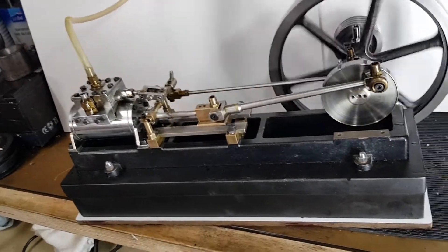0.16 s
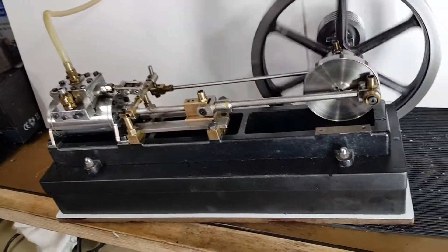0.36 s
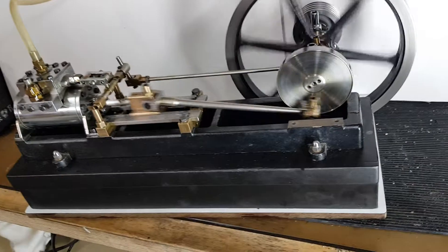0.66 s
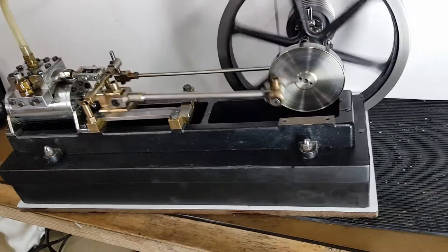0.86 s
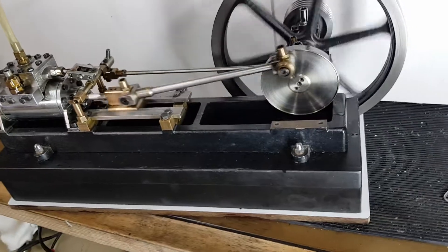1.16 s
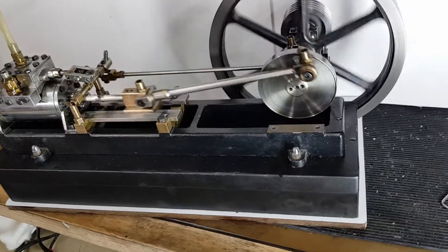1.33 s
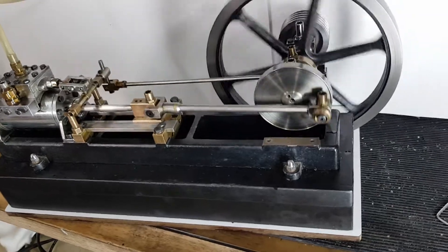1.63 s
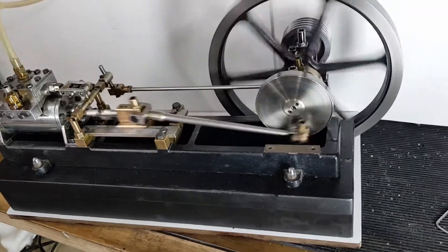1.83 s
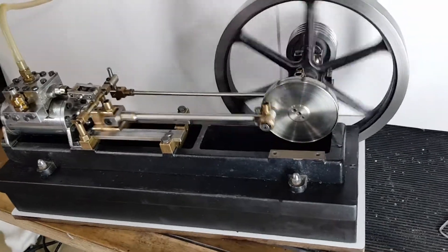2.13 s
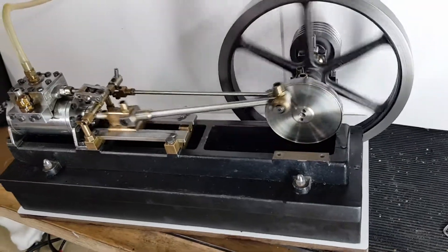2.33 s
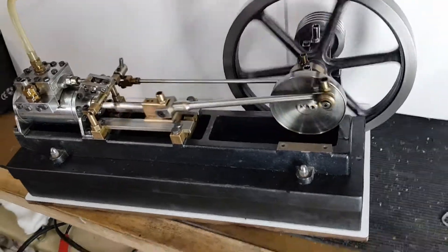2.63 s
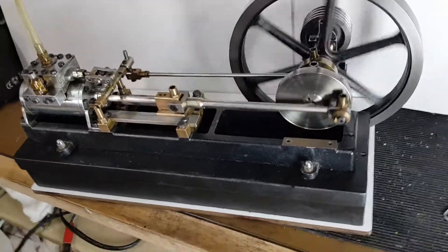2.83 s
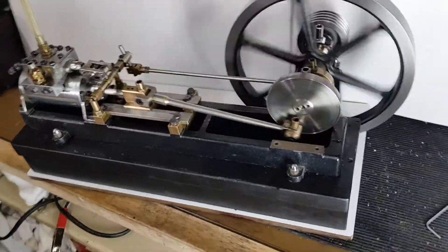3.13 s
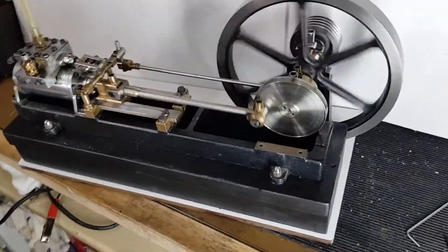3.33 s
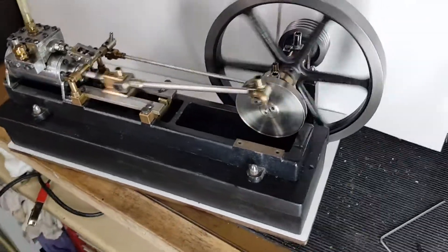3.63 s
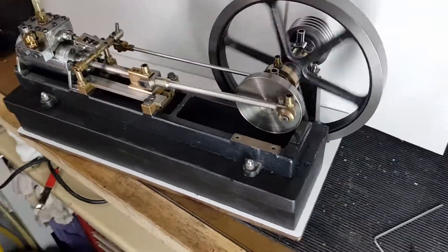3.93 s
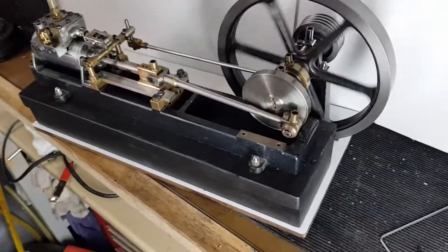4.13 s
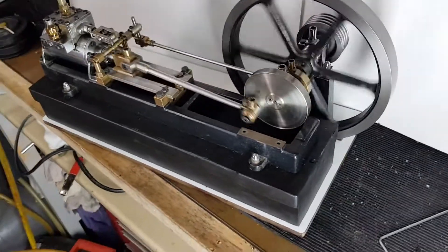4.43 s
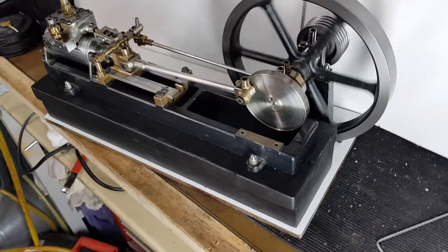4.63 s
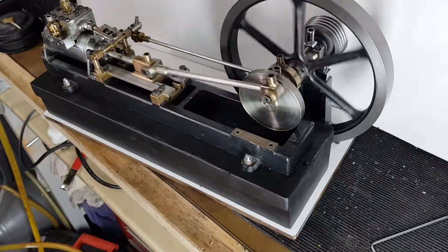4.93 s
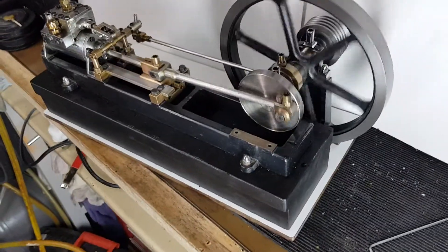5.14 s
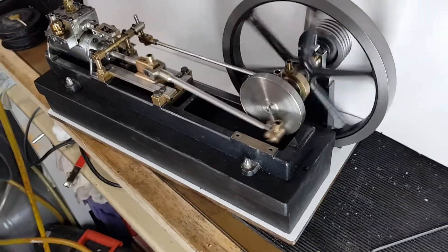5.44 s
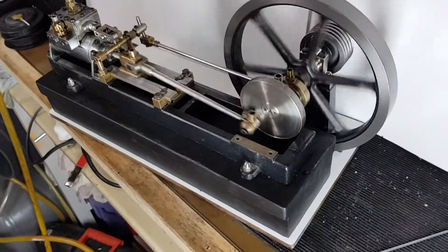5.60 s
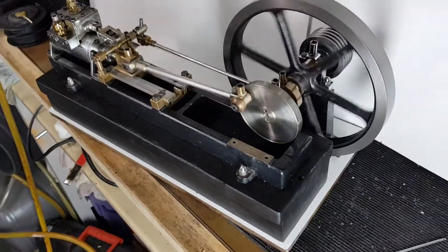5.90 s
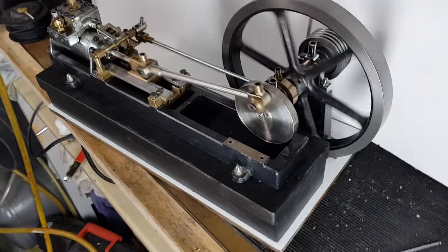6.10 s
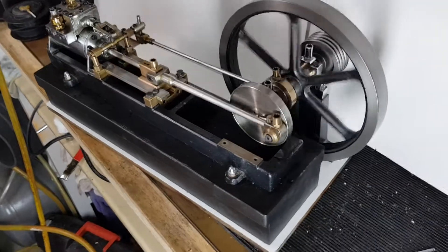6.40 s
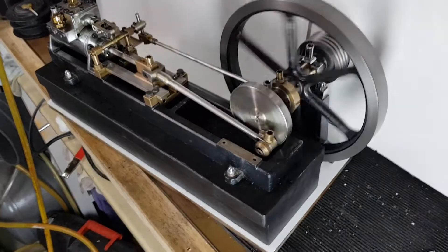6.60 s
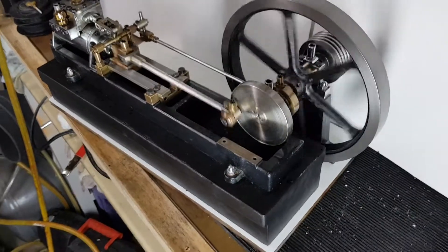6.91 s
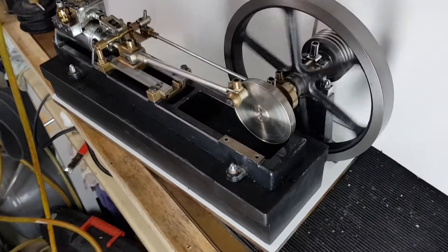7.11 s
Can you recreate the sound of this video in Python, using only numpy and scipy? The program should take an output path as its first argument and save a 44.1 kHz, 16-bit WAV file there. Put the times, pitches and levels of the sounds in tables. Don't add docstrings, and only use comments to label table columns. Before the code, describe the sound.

Close handheld stereo pickup of a miniature air-driven engine indoors. High, thin hiss dominates, dipping around two seconds and growing stronger as the phone comes nearer. Slow, regular little knocks ring briefly in the metal bed, with valve chirps and breathy exhaust sighs around them. Narrow whistles come and go over a faint rumble and distant motor hum. Loud bumps, rubs and case creaks hit the right channel early and late, briefly ducking the rest.

```python
import sys
import numpy as np
from scipy import signal
from scipy.fft import rfft, irfft
from scipy.io import wavfile
from scipy.ndimage import uniform_filter1d, map_coordinates

SR = 44100
rng = np.random.default_rng(int(sys.argv[2]) if len(sys.argv) > 2 else 0)


def elevation(decibels):
    levels = np.asarray(decibels, float)
    return 10 ** (levels / 20)


def master(y):
    cut = np.clip(np.atleast_2d(y).T, -1, 1)
    pcm = np.round(cut * 32767)
    wavfile.write(sys.argv[1], SR, pcm.astype(np.int16))


N = 320166

# frequency in Hz, level in dB per Hz.
LEAK_LOW_LEFT = [(2500, -33), (3900, -23.5), (4150, -13.5), (5200, -7), (5900, 1), (6300, -2), (7000, -5.5),
                 (8000, -14), (9500, -20)]
LEAK_LOW_RIGHT = [(2500, -31.5), (3900, -23.5), (4200, -11.5), (5300, -3.5), (6000, -0.5), (6600, -2),
                  (7300, 1), (8200, -10.5), (9500, -21.5)]
LEAK_HIGH_LEFT = [(8000, -17.5), (9500, -11.5), (10500, -6), (11300, -1.5), (12200, 2.5), (12800, -3),
                  (13300, -10), (15800, -28)]
LEAK_HIGH_RIGHT = [(8000, -10), (9500, -9), (10500, -4), (11500, -2), (12200, 2.5), (13000, -1.5),
                   (13700, -5.5), (15800, -16)]
LEAK_TOP_LEFT = [(12500, -16.5), (13300, -1), (13800, 1), (14300, -4.5), (15000, -2), (15800, -3.5)]
LEAK_TOP_RIGHT = [(12500, -18), (13600, -7), (14300, -4), (15000, -2), (15400, -1), (15800, -6)]
# time in seconds, left level in dB, right level in dB, both against the upper band.
GLINT = [(0, -12, -8), (.6, -5, -4), (1.0, -3, 3), (2.2, -14, -12), (2.9, -12, -2), (3.2, -10, 2.5),
         (3.8, -5, 0), (4.3, -12, -13), (4.9, -10, -1), (5.3, -4, -4), (5.7, -8, 0), (6.1, -13.5, -3.5),
         (6.5, -6.5, -9), (7.26, -6.5, -9)]
# time in seconds, leak level by nearness in dB,
# facing (left over right) in dB, aim at the jet in dB.
PHONE = [(0, -48.5, 6.5, -1), (.45, -47.5, 6.5, -2.5), (.72, -46.5, 1, -0.5), (1.05, -51.5, 4.5, -2),
         (1.65, -54.5, 7.5, 1.5), (2.25, -55, 7.5, 2.5), (2.6, -55.5, 8, -2), (2.95, -52.5, 4, 0.5),
         (3.15, -48.5, 1, 0), (3.5, -46.5, 0, 0.5), (4.05, -45.5, 1.5, 0.5), (4.65, -45.5, -0.5, 3.5),
         (5.35, -46.5, 1, -1), (5.75, -44, 1, 3.5), (6.0, -48, 7, 4.5), (6.4, -47, -1.5, 0.5),
         (7.0, -50.5, -1.5, 4.5), (7.26, -53.5, 2, 2)]
SURGE_DB = [6.9, 5.1, 3.3, 6.1, 6.6, 3.6, 6, 5.3, 3.7, 3.1, 7.2, 3, 9.9]
# start in seconds, end in seconds, pitch in Hz, level over the low jet in dB.
WHISTLES = [
    (0, .7, 5970, -10.5),
    (3.05, 3.3, 6100, -22),
    (3.673, 4.5, 5980, -7.5),
    (3.68, 4.2, 5840, -21),
    (4.3, 5.74, 5670, -16.5),
    (4.7, 5.74, 5845, -12.5),
    (4.8, 5.6, 6050, -19),
    (5.846, 6.406, 5850, -19),
    (5.85, 6.396, 6090, -17),
]
# time in seconds, peak in dB, brightness in dB, left over right in dB.
KNOCKS = [(0.487, -40, -23.5, 0), (1.043, -40.5, -11.5, 1), (1.708, -52, -21, -6),
          (2.262, -42.5, -16.5, -3), (2.942, -44.5, -2.5, -4), (3.494, -36, -7.5, -0.5),
          (4.136, -38.5, -21.5, -3), (4.679, -37, -5.5, 1.5), (5.342, -44, -19.5, 0), (5.904, -39, -8, -2),
          (6.559, -43.5, -19.5, 0), (7.086, -43, -7.5, 1.5)]
# pitch in Hz, level in dB, time to fade by 60 dB in seconds.
BED = [(158, 0.5, 0.086), (224, -11.5, 0.038), (324.6, -1.5, 0.089), (426, -3, 0.011), (500, 2.5, 0.089),
       (610, -6, 0.048), (679, -10, 0.089), (900, -22, 0.038), (1050, -11, 0.091), (1350, 0, 0.018),
       (1616, -8, 0.042), (1770, -12, 0.012), (2500, -17, 0.005), (3500, -6, 0.003)]
# time in seconds, left level in dB, right level in dB, seat tap in dB.
CHIRPS = [(0.4204, -40, -45, -73), (0.9971, -50, -52, -80), (1.643, -53, -50, -78), (2.218, -59, -55, -78),
          (2.8788, -48, -51, -80), (3.454, -50, -41.5, -79), (4.0739, -43, -41.5, -77),
          (4.6347, -41.5, -49, -76), (5.274, -38.5, -42, -73.5), (6.4944, -42.5, -44.5, -77),
          (7.0503, -51.5, -56, -86)]
# start in seconds, length in seconds, pitch in Hz,
# level in dB, broad air in dB against the note.
SIGHS = [(0.61, 0.13, 1350, -84, -12), (1.128, 0.13, 1235, -72, -19), (1.76, 0.3, 1350, -77.5, 9),
         (3.056, 0.14, 1318, -69.5, -3), (3.528, 0.23, 1296, -67, -8), (4.201, 0.17, 1355, -62.5, -7),
         (4.725, 0.22, 1300, -63.5, -6), (5.4, 0.22, 1350, -67, 5), (5.954, 0.22, 1300, -65, -12),
         (6.648, 0.14, 1350, -67.5, -5), (7.111, 0.15, 1246, -66.5, -7)]
# start in seconds, length in seconds, level in dB.
PUFF = (2.928, .1, -47)
# time in seconds, level in dB.
GRIP = [(0, -42.5), (.44, -43), (.66, -35.5), (.76, -38.5), (.88, -56.5), (1.25, -46.5), (1.76, -51),
        (2.2, -43), (2.86, -43.5), (3.5, -60), (4.6, -50), (5.3, -66), (5.6, -53), (5.72, -34.5),
        (5.85, -34), (6.03, -40.5), (6.17, -33), (6.35, -62)]
# time in seconds, pressure step in dB, direction,
# rise in milliseconds, wind-up as a share of the step.
BUMPS = [(.6754, -13.5, 1, 2.0, 0), (.6843, -21, 1, 0.8, 0.9), (.6868, -15, -1, 3, 0.057),
         (.6898, -12.5, 1, 0.57, 1), (.6923, 5, 1, 1.06, 0.22), (.7101, -3.5, 1, 0.69, 0.34),
         (.7119, -12.5, -1, 0.79, 0), (5.7715, -6, -1, 0.4, 0.42), (5.7731, -11, 1, 1.5, 0),
         (5.7847, -19, 1, 0.59, 0.84), (5.791, -10, 1, 1.3, 0), (5.795, -13.5, -1, 0.9, 0.1),
         (5.799, -15, 1, 0.6, 0), (5.8044, -6.5, 1, 4.7, 0), (5.8158, -14, 1, 0.99, 1),
         (6.1766, 5, 1, 2.14, 0.35)]
# time in seconds, pressure step in dB, rise in milliseconds.
SHIFTS = [(0.238, -27.5, 3.2), (0.3329, -29.5, 1.4), (0.7928, -37, 0.56), (1.108, -36.5, 0.74),
          (1.1837, -34.5, 2.3), (1.2928, -26.5, 1.83), (1.347, -32.5, 1.6), (1.4473, -26.5, 1.47),
          (1.4992, -26, 1.12), (1.6558, -28, 1.1), (1.987, -32, 0.98), (2.0568, -33.5, 0.9),
          (2.1294, -31.5, 0.53), (2.2617, -27.5, 0.65), (2.42, -32, 3), (2.5326, -34, 0.5),
          (2.62, -38, 1.7), (2.824, -26.5, 4.9), (3.0274, -34, 1), (3.0372, -25, 4.8), (3.185, -38.5, 1.4),
          (3.649, -41, 0.59), (3.6951, -34.5, 0.88), (4.462, -33.5, 1.3), (4.528, -29.5, 1.15),
          (5.533, -41.5, 1.1), (5.972, -27, 2.1), (6.05, -19, 4.5), (6.078, -20, 4.9), (6.242, -24, 0.72),
          (6.3636, -29.5, 0.32)]
# time in seconds, length in milliseconds, step in dB,
# loss per swing in dB, gap in milliseconds.
JUDDERS = [
    (5.664, 4, -18, 1.5, 2.35),
    (5.6698, 6.5, -21, 1, 1.66),
    (5.7119, 14, -16, 0.6, 2.08),
    (6.1822, 8, -10, .3, 2.69),
]
# start in seconds, length in seconds, level in dB, treble cut in Hz.
RUBS = [(0.631, 0.047, -43.5, 2490), (0.648, 0.009, -39, 3000), (0.667, 0.009, -37, 1500),
        (0.681, 0.01, -29, 1000), (0.705, 0.023, -39.5, 900), (2.108, 0.038, -56, 900),
        (2.225, 0.044, -44, 1150), (2.359, 0.048, -59, 1200), (2.506, 0.051, -52.5, 1200),
        (2.658, 0.066, -57.5, 1000), (2.879, 0.057, -60, 1000), (4.102, 0.031, -43.5, 3500),
        (4.52, 0.053, -67, 500), (5.655, 0.028, -43.5, 600), (5.702, 0.051, -35, 800),
        (5.746, 0.027, -28.5, 1800), (5.766, .032, -23.5, 900), (5.797, 0.022, -25.5, 1030),
        (6.068, 0.035, -54.5, 900), (6.162, 0.037, -33, 700), (6.175, 0.013, -24.5, 1500),
        (6.185, 0.013, -39.5, 1800), (6.23, 0.014, -44, 900)]
# time in seconds, level in dB, pitch in Hz.
TICKS = [(0.628, -28, 2500), (0.6306, -14, 3340), (0.636, -25, 3000), (.641, -32, 2500), (0.647, -19, 3600),
         (.650, -25, 3600), (0.654, -29, 2400), (.6755, -25.5, 1600), (.684, -18, 1300),
         (0.6882, -26, 1500), (0.692, -19.5, 2500), (0.7102, -28, 1790), (5.675, -31.5, 2500),
         (5.716, -35, 1800), (5.726, -30, 1400), (5.752, -30, 1400), (5.758, -27, 1400), (5.764, -30, 1500),
         (5.8, -19, 1700), (5.808, -27, 1900), (5.8162, -18.5, 1690), (6.168, -31.5, 1700),
         (6.1772, -15.5, 1800), (6.184, -18, 1700), (6.3623, -40.5, 3000)]
# time in seconds, drop in dB.
DUCKS = [
    (.69, 4.5),
    (5.775, 4.5),
    (6.18, 7.5),
]
# frequency in Hz, level in dB per Hz.
SLIDE = [(300, 2), (600, -5), (900, -3), (1300, -3), (1900, -1), (2600, 1), (3400, 5.5), (3800, 6),
         (4300, 8), (6000, -5.5)]
SLIDE_STROKE_DB = [-0.5, -1.5, -4.5, 3, 0, -2, 1, 1, -1.5, 3, 6, 0, -1]
# frequency in Hz, level in dB per Hz.
RUMBLE = [(25, -25), (45, -2.5), (62, 6.5), (90, -17), (140, -18.5), (300, -19), (550, -34.5), (900, -47.5)]
# time in seconds, level in dB.
STEPS = [(0, -4), (.15, 2), (.35, 1.5), (1.2, -1.5), (3.2, 1), (3.35, -3), (3.55, 0), (3.9, 4), (4.3, -0.5),
         (4.65, 5.5), (5, -7), (5.35, 0.5), (5.65, -6.5), (6, -1), (7.26, -1)]
# start in seconds, end in seconds, level in dB.
DRONE = [
    (0.122, 1.6, -63.5),
    (3.116, 3.703, -65.5),
    (3.695, 4.517, -61.5),
    (4.483, 6.1, -64.5),
    (6.396, 7.305, -73.5),
]
# start in seconds, end in seconds, pitch in Hz, level in dB.
DRAUGHT = (0, 0.9, 2103, -77.5)


def unit(x):
    return x / np.sqrt(np.mean(x ** 2, axis=-1, keepdims=True) + 1e-20)


def track(rows):
    s, *columns = np.transpose(rows)
    return [np.interp(np.arange(N) / SR, s, column) for column in columns]


def band(x, low_hz, high_hz, order):
    return signal.sosfilt(signal.butter(order, [low_hz, high_hz], "band", fs=SR, output="sos"), x)


def colour(x, points):
    hz, level_db = np.transpose(points)
    bins = np.maximum(np.arange(N // 2 + 1) * SR / N, 1)
    gain_db = np.interp(np.log(bins), np.log(hz), level_db, left=-70, right=-70)
    return unit(irfft(rfft(x) * elevation(gain_db), N))


def drift(rate):
    r = np.exp(-80 * np.pi * rate / SR)
    chance = rng.standard_normal(N // 40 + 4002)
    slow = signal.lfilter([1], [1, -2 * r, r * r], chance)[4000:]
    return np.interp(np.arange(N) / 40, np.arange(len(slow)), unit(slow - slow.mean()))


def ring(x, hz, t60):
    r, w = elevation(-60 / (t60 * SR)), 2 * np.pi * hz / SR
    return signal.lfilter([0, np.sin(w)], [1, -2 * r * np.cos(w), r * r], x + 1e-18)


def add(out, x, s, pan_db=0):
    i = round(s * SR)
    sides = elevation(np.array([[.5], [-.5]]) * pan_db)
    out[:, i:i + x.shape[-1]] += x[..., :N - i] * sides


def swell(length, rise):
    place = np.linspace(0, 1, max(round(length * SR), 8))
    height = np.interp(place, [0, np.clip(rise, .02, .9), 1], [0, 1, 0])
    return np.sin(np.pi / 2 * height) ** 2


def reflections(x, depth, span_hz, span_s):
    hz, s, frames = signal.stft(x, SR, nperseg=2048)
    grid = np.meshgrid(hz / span_hz, s / span_s, indexing="ij")
    knots = rng.standard_normal((2, 400, 60))
    real, imag = [map_coordinates(k, grid, order=1, mode="mirror") for k in knots]
    return signal.istft(frames * (1 + depth * (real + 1j * imag)), SR, nperseg=2048)[1][:N]


def strokes():
    stroke_s, valve_lead_s = 0.66, 0.025
    ends = np.array(KNOCKS)[:, 0] - valve_lead_s
    ends = np.r_[ends[0] - stroke_s, ends, ends[-1] + stroke_s]
    return np.interp(np.arange(N) / SR, ends, np.arange(len(ends)))


def surge():
    turn = strokes()
    return np.array(SURGE_DB)[turn.astype(int)] * np.sin(np.pi * turn) ** 2


def jet_levels():
    near_db, facing_db, aim_db = track(PHONE)
    surge_db = surge()
    low_db = near_db + 0.33 * surge_db
    high_db = near_db - 1.5 - 2.0 + aim_db + surge_db
    lean_db = 0.97 * facing_db - 2.5
    low = elevation(low_db + facing_db / 2), elevation(low_db - facing_db / 2)
    high = elevation(high_db + lean_db / 2), elevation(high_db - lean_db / 2)
    return low, high


def leak():
    jet = rng.standard_normal(N) * elevation(0.82 * drift(40))
    low, high = jet_levels()
    glint = [elevation(db) for db in track(GLINT)]
    lead_ms = (.2, 0.0087)
    colours = ((LEAK_LOW_LEFT, LEAK_HIGH_LEFT, LEAK_TOP_LEFT), (LEAK_LOW_RIGHT, LEAK_HIGH_RIGHT, LEAK_TOP_RIGHT))
    out = []
    for side, (lower, upper, top) in enumerate(colours):
        early = np.roll(jet, -round(lead_ms[side] * SR / 1000))
        heard = unit(reflections(early, depth=2.17, span_hz=59.9, span_s=.45))
        heard = heard + 0.41 * rng.standard_normal(N)
        low_part = low[side] * elevation(0.25 * drift(17)) * colour(heard, lower)
        high_part = colour(heard, upper) + glint[side] * colour(heard, top)
        out.append(low_part + high[side] * elevation(0.5 * drift(8.5)) * high_part)
    shade = np.clip(1.9 - 2.03 * low[1] / low[0], 0, .985)
    notch = signal.butter(3, [6800, 9000], "band", fs=SR, output="sos")
    out[1] = out[1] - shade * signal.sosfiltfilt(notch, out[1])
    return np.array(out)


def whistle():
    t60_s, fade_s = 0.028, 0.044
    low, _ = jet_levels()
    t, noise, tone = np.arange(N) / SR, rng.standard_normal(N), np.zeros(N)
    for start, end, hz, db in WHISTLES:
        a, b = max(round((start - .1) * SR), 0), round((end + .1) * SR)
        inside = np.minimum(t[a:b] - start, end - t[a:b])
        heard = np.clip(inside / fade_s + .5, 0, 1)
        tone[a:b] += elevation(db) * heard * unit(ring(ring(noise[a:b], hz, t60_s), hz, t60_s))
    return elevation(1.16 * drift(6.6)) * np.array([low[0] * np.roll(tone, -8), low[1] * tone])


def knock(bright_db):
    chance = rng.standard_normal((2, round(.18 * SR)))
    buzz = band(chance[:, ::-1], 250, 1800, 1)
    bounces = (chance[0] + 0.46 * chance) ** 3
    sharp = np.clip(1.43 + bright_db / 22, .15, 1)
    body = 0
    for hz, db, t60 in BED:
        blow = np.zeros(bounces.shape)
        rattle = swell(0.007 + 4.5 / hz, 0.074)
        late = round((0.0036 + sharp * 3.73 / hz) * SR)
        hit = slice(late, late + len(rattle))
        blow[:, hit] = rattle * bounces[:, hit]
        uneven_db = rng.normal(0, 1.8, (2, 1))
        treble_db = np.clip(np.log2(hz / 550), 0, 1) * (bright_db + 8.5)
        rung = ring(blow, hz, t60)
        body = body + elevation(db + treble_db + uneven_db) * rung / np.abs(rung).max(axis=1, keepdims=True)
    t = np.arange(buzz.shape[1]) / SR
    buzz_shape = elevation(-21.5 - 190 * t) * np.clip(t / .012, 0, 1) ** 2
    return body / np.abs(body).max() + buzz_shape * unit(buzz)


def chirp(out, s, left_db, right_db, tap_db):
    shape = swell(0.032, 0.095)
    edge = rng.standard_normal(len(shape)) * shape
    pitches = np.array([4170, 4300]) * (1 + .015 * rng.standard_normal(2))
    tones = unit(np.array([ring(ring(edge, hz, 0.0084), 1.014 * hz, 0.008) for hz in pitches]))
    add(out, elevation(np.array([[left_db], [right_db]]) - 8.0) * tones, s - .004)
    add(out, elevation(tap_db) * unit(ring(ring(edge, 910, 0.016), 920, 0.016)), s - .006, 3.0)


def sigh(length, hz, airy_db):
    shape = swell(length + .08, 0.18) ** 0.52
    chance = rng.standard_normal((6, len(shape)))
    throb = elevation(1.1 * unit(uniform_filter1d(chance[0], size=900)))
    wobble = np.cumsum(uniform_filter1d(chance[1], size=600)) * .12
    sag = hz * (1 + 0.045 * np.sin(np.linspace(0.3, np.pi, len(shape))) - .028)
    note = np.sin(2 * np.pi * np.cumsum(sag) / SR + wobble)
    breathy = unit(ring(ring(chance[2:4], hz, .04), 1.01 * hz, 0.038))
    air = unit(ring(chance[4:], 1.1 * hz, 0.016) + 0.71 * ring(chance[4:], 1.9 * hz, 0.011))
    air = air * elevation(airy_db + np.array([[-3.0], [3.0]]))
    return shape * (throb * (1.13 * note + 0.65 * breathy) + air)


def puff(length):
    chance = rng.standard_normal(round(length * SR))
    shape = swell(length, 0.12) ** 0.87 * elevation(3.1 * unit(uniform_filter1d(chance, size=120)))
    return shape * unit(band(rng.standard_normal((2, len(shape))), 1250, 3400, 2))


def engine():
    out = np.zeros((2, N))
    for s, peak_db, bright_db, pan_db in KNOCKS:
        add(out, elevation(peak_db + 3.0) * knock(bright_db), s - .0115, pan_db)
    for s, left_db, right_db, tap_db in CHIRPS:
        chirp(out, s, left_db, right_db, tap_db)
    for s, length, hz, level_db, airy_db in SIGHS:
        add(out, elevation(level_db - 4.5) * sigh(length, hz, airy_db), s - .02)
    s, length, level_db = PUFF
    add(out, elevation(level_db) * puff(length), s)
    return out


def slips():
    judders = []
    for s, length, db, loss_db, gap in JUDDERS:
        for k in range(int(np.ceil(length / gap))):
            direction = -(-1) ** k
            judders.append((s + k * gap / 1000, db - loss_db * k, direction, 1, 0.14))
    shifts = [(s, db, 1, rise, 0.4) for s, db, rise in SHIFTS]
    return BUMPS + judders + shifts


def slip_flow():
    flow = np.zeros(N)
    for s, step_db, direction, rise_ms, windup in slips():
        step, before = swell(1.77 * rise_ms / 1000, 0.35), swell(1.7 * rise_ms / 1000, 0.9)
        size, i = np.sign(direction) * elevation(step_db), round(s * SR)
        flow[i:][:len(step)] += size * step / step.sum()
        flow[i - len(before):i] -= size * windup * before / before.sum()
    return flow


def rubs():
    out = np.zeros(N)
    for s, length, level_db, dull_hz in RUBS:
        shape = swell(1.4 * length, .42) ** .9
        grains = rng.standard_normal(len(shape)) * elevation(5.7 * rng.standard_normal(len(shape)))
        grains = signal.sosfilt(signal.butter(1, min(dull_hz, 9000), fs=SR, output="sos"), grains)
        grains = band(grains, 260, 5500, 2)
        grains = unit(grains) + 0.22 * unit(ring(grains, 1960, 0.0014))
        out[round(s * SR):][:len(shape)] += elevation(level_db) * shape * unit(grains)
    return out


def creaks():
    out = np.zeros(N)
    click = np.r_[1., np.zeros(600)]
    for s, db, hz in TICKS:
        i = round(s * SR)
        crack = ring(click, hz, 6.4 / hz)
        crack = crack + 0.45 * ring(click, 1.4 * hz, 0.0017) + 0.24 * ring(click, 0.75 * hz, 0.0044)
        out[i:i + len(click)] += elevation(db) * crack
    return band(out, 700, 7000, 2)


def port(x):
    for hz, q in ((60.6, 1.35), (40, .7)):
        w = 2 * np.pi * hz / SR
        a = np.sin(w) / (2 * q)
        x = signal.lfilter(np.array([1, -2, 1]) * (1 + np.cos(w)) / 2, [1 + a, -2 * np.cos(w), 1 - a], x)
    return x


def creep():
    sizes = elevation(2.1 * np.minimum(rng.exponential(1, N), 3))
    nudges = rng.standard_normal(N) * (rng.random(N) < 250 / SR) * sizes
    nudges = signal.sosfilt(signal.butter(2, 170, fs=SR, output="sos"), nudges)
    return unit(port(signal.lfilter([1], [1, -.999], nudges)))


def fingers():
    pressure = signal.lfilter([1], [1, -.9995], slip_flow()) + rubs() + creaks()
    held = elevation(-4.5) * elevation(track(GRIP)[0]) * creep()
    return (port(pressure) + held) * elevation(np.array([[-66], [0]]))


def rustle():
    skin = band(rng.standard_normal(N), 500, 3000, 1)
    return elevation(-28 + 2.1 * drift(15)) * elevation(track(GRIP)[0]) * unit(skin) * np.array([[0], [1]])


def nearness():
    near_db = track(PHONE)[0]
    return near_db - near_db.mean()


def sliding():
    turn = strokes()
    swing_db = 2 * np.cos(2 * np.pi * (turn - 0.18))
    swing_db = swing_db + np.interp(turn, np.arange(len(SLIDE_STROKE_DB)) + .5, SLIDE_STROKE_DB)
    level = elevation(-66.5 + 0.51 * nearness() + swing_db)
    sides = [reflections(side, depth=1.54, span_hz=89.84, span_s=.3) for side in rng.standard_normal((2, N))]
    return elevation(0.94) * level * colour(np.array(sides), SLIDE) * elevation(1.2 * drift(14.0))


def rumble():
    level = elevation(-61 + 0.38 * nearness() + 0.41 * (surge() - 1.5) + track(STEPS)[0])
    shake = rng.standard_normal(N) + 0.61 * rng.standard_normal((2, N))
    return elevation(5.0) * level * colour(shake, RUMBLE) * elevation(3.3 * drift(5.6))


def drone():
    t = np.arange(N) / SR
    level = elevation(-79.5)
    for start, end, db in DRONE:
        level = level + elevation(db) * np.clip(np.minimum(t - start, end - t) / 0.16 + .5, 0, 1)
    noise = rng.standard_normal(N) + 0.15 * rng.standard_normal((2, N))
    return elevation(-0.26) * level * unit(ring(ring(noise, 196.2, 0.14), 199.3, 0.16))


def draught():
    _, end, hz, db = DRAUGHT
    heard = np.clip((end - np.arange(N) / SR) / 0.077, 0, 1)
    air = ring(ring(rng.standard_normal((2, N)), hz, .012), 0.964 * hz, 0.011)
    return elevation(db + 2.8 * drift(13.0) + np.array([[3.0], [-3.0]])) * heard * unit(air)


def ducking():
    t, release_s = np.arange(N) / SR, 0.31
    return elevation(-sum(db * (t > s) * np.exp(-np.abs(t - s) / release_s) for s, db in DUCKS))


def scene():
    bench = leak() + whistle() + engine() + sliding() + rumble() + drone()
    return ducking() * bench + fingers() + rustle() + draught()


def top_cut(x):
    return signal.sosfilt(signal.butter(12, 15830, fs=SR, output="sos"), x)


def record(dry):
    held = np.clip(dry, -.98, .98)
    mix = signal.sosfilt(signal.ellip(10, .3, 60, 15780, fs=SR, output="sos"), held)
    return top_cut(mix)


dry = scene()
out = record(dry)
master(out)
```